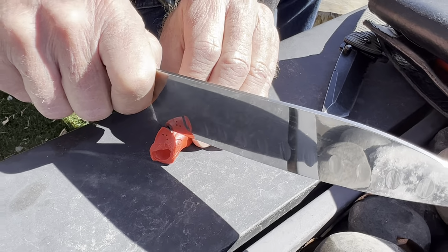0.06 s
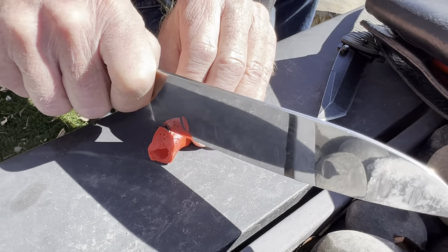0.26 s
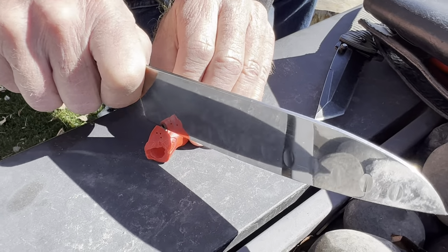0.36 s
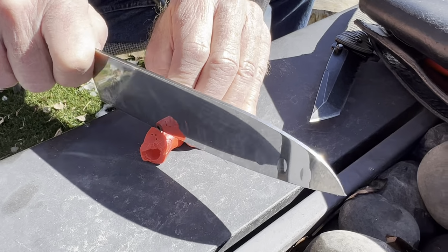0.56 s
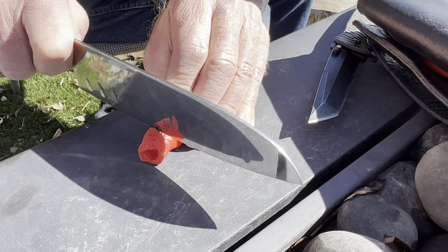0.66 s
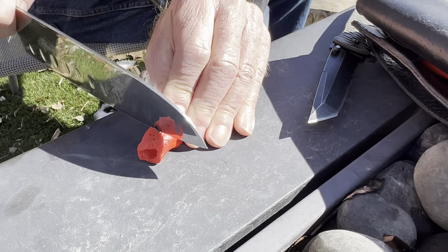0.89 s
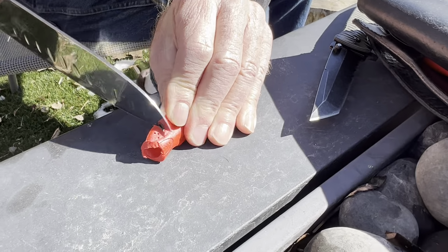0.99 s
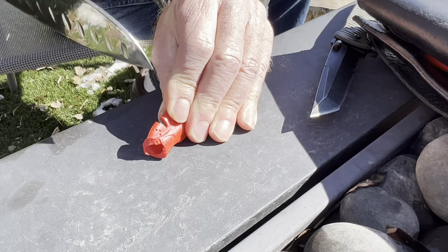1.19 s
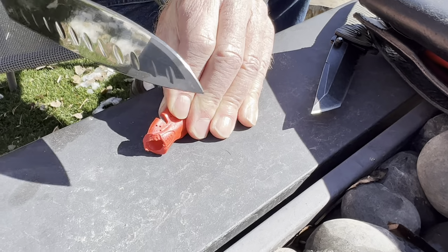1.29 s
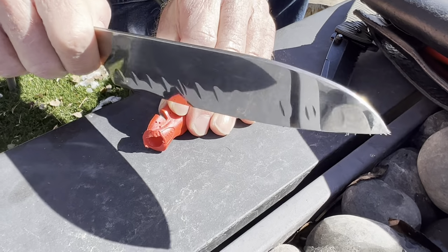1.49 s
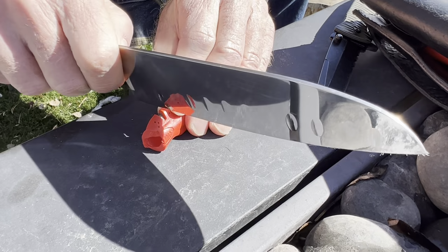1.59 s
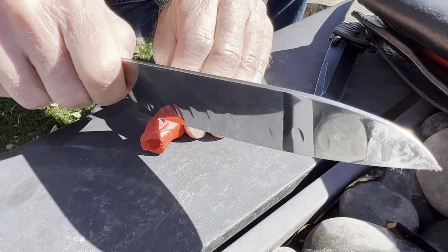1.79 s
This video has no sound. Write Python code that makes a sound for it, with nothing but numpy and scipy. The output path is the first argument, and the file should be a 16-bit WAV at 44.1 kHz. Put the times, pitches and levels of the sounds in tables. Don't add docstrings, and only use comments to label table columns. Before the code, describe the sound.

A knife blade drags through a carbide sharpener with one harsh, juddering metallic scrape outdoors

```python
import sys
import numpy as np
from scipy import signal
from scipy.fft import rfft, irfft, next_fast_len
from scipy.io import wavfile
from scipy.ndimage import uniform_filter1d

SR = 44100
rng = np.random.default_rng(int(sys.argv[2]) if len(sys.argv) > 2 else 0)


def undo_db(level):
    steps = np.asarray(level, float) / 20
    return 10 ** steps


def to_wav(sig):
    pcm = np.clip(np.atleast_2d(sig), -1, 1) * 32767
    pcm = np.round(pcm).astype(np.int16)
    wavfile.write(sys.argv[1], SR, pcm.T)


N = 81585
T_S = np.arange(N) / SR
FFT_SIZE = next_fast_len(N + 16384)
FFT_HZ = np.arange(FFT_SIZE // 2 + 1) * SR / FFT_SIZE

# (frequency [Hz], level [dB])
AIR_SPECTRUM = [(150, -4), (400, -11.5), (1000, -9.5), (2000, -18), (3800, -32.5), (5700, -28.5),
                (12000, -35), (15500, -40)]
# (time [s], level [dB])
GUST_LEVEL = [(0, -47.5), (.3, -44.5), (.65, -38), (.9, -36.5), (1.03, -32), (1.11, -45), (1.2, -26.5),
              (1.32, -38), (1.47, -43), (1.55, -29.5), (1.68, -47.5), (1.85, -40.5)]
# (frequency [Hz], level [dB])
WIND_SPECTRUM = [(25, -45), (45, -1.5), (75, 0), (130, -6.5), (250, -14.5), (500, -30.5)]
# (centre [s], peak [dB], frequency [Hz], left minus right [dB])
LARGE_EDDIES = [(0.107, -25, 63, -1), (.16, -30, 68.6, -2), (.535, -29.5, 65, 6), (0.626, -31, 72, 1),
                (.845, -24, 64, 3), (0.985, -17, 77.5, -0.5), (1.049, -37, 61.6, -16), (1.151, -28, 63, 5),
                (1.222, -27.5, 81, 7), (1.274, -30, 68, -2), (1.356, -22.5, 87.5, -3), (1.4, -24, 66.6, -3),
                (1.527, -29, 78, -2), (1.555, -22, 101, 1), (1.589, -45, 80, -8), (1.736, -26.5, 108, -2.5),
                (1.755, -29, 76, -1), (1.811, -38.5, 111, -2)]
# (centre [s], peak [dB], frequency [Hz], left minus right [dB])
SMALL_EDDIES = [(1.127, -51, 168, -1), (1.184, -22, 140, 1), (1.198, -25, 168, 3), (1.21, -23.5, 171, 2),
                (1.226, -33, 150, -5), (1.24, -32.5, 169, 7), (1.259, -34, 178, 0),
                (1.361, -35.5, 163, -11), (1.461, -50, 159, 0), (1.525, -25.5, 168, 0),
                (1.555, -28, 169, -2), (1.581, -27.5, 193, 1), (1.739, -36.5, 167, 0)]
# (time [s], pressure [dB], sliding speed [dB], extra ring near the tip tone [dB])
STROKE = [
    (.275, -60, -68, -6),
    (.287, -33.5, -46, -3),
    (.34, -26.5, -51, -5),
    (.39, -20.5, -39, -7.5),
    (.6, -24, -38, -0.5),
    (.8, -23, -38, -1),
    (.92, -29.5, -37, 10),
    (1.028, -31, -44.5, 15.5),
    (1.042, -49, -54.5, 10),
    (1.11, -72, -72, 9),
]
# (time [s], strength [dB])
EDGE_BITES = [
    (0.28, -29),
    (0.3, -19),
    (0.318, -30),
    (.347, -30),
    (0.377, -40),
    (0.912, -6.5),
    (0.95, -19),
    (0.975, -27),
    (1.01, -23.5),
    (1.021, -30),
]
# (time [s], peak [dB], frequency [Hz])
JUDDERS = [(0.381, -15, 590), (0.386, -13, 570), (0.402, -21, 630), (0.413, -24, 623), (0.429, -17, 560),
           (0.438, -15, 656), (0.443, -13, 605), (0.465, -18, 610), (0.472, -10, 580), (0.48, -17, 660),
           (0.491, -8.5, 590), (0.498, -13.5, 553), (0.505, -25, 594), (0.516, -20, 560), (0.522, -30, 520),
           (0.528, -13, 440), (0.537, -17, 590), (0.554, -6, 550), (0.566, -8, 552), (0.583, -24, 585),
           (0.591, -27, 610), (0.605, -20, 545), (0.611, -27, 586), (0.621, -24, 626), (0.627, -19, 526),
           (0.633, -27, 547), (0.651, -19.5, 532), (0.658, -20, 606), (0.663, -21.5, 600),
           (0.671, -20.5, 595), (0.679, -15.5, 550), (0.688, -14.5, 550), (0.693, -10.5, 628),
           (0.702, -16, 590), (0.71, -23, 630), (0.731, -28, 535), (0.752, -32, 620), (0.77, -19.5, 620),
           (0.782, -17.5, 674), (0.802, -21, 580), (0.815, -20, 584), (0.823, -17, 576), (0.89, -17, 487),
           (0.901, -12.5, 574), (0.92, -14, 580), (0.929, -30, 600), (0.935, -20, 580), (0.941, -18, 495),
           (0.974, -16.5, 596), (0.981, -19, 580), (1.01, -21.5, 580), (1.016, -18.5, 563),
           (.286, -30.5, 443), (.303, -24, 570), (.324, -24.5, 544), (.5615, -12, 507)]
# (frequency [Hz], level [dB], t60 [s])
BODY_MODES = [(355, -11, 0.12), (438, -8, 0.1), (548, 0, 0.035), (600, -1, 0.045), (665, 3, 0.04),
              (722, -2, 0.03), (880, -16, .05), (962, -10.5, 0.06), (1145, -12, .05), (1230, -13, .04),
              (1410, -10, 0.035), (1800, -5.5, 0.016), (1990, -5, 0.025), (2260, -8, 0.045)]
# (frequency [Hz], density [dB per Hz])
RASP_SPECTRUM = [(300, -5), (1000, -9.5), (2300, -10.5), (3500, -18), (6300, -22), (9300, -24),
                 (11500, -17), (15850, -30)]
# (frequency [Hz], level [dB], t60 [s])
GRIPPED_MODES = [(2600, -3, .02), (3100, 0, .03), (3650, -2, .03), (5370, 0, .025), (5700, -2, .03),
                 (7430, -4, .02), (8380, -3, .025), (11500, 0, .01), (13400, -4, .01)]
# (frequency [Hz], level [dB], t60 [s])
FREE_MODES = [(5609, 0, .5), (6761, -8, .3), (7973, -9, .19), (12160, -5, .25), (12930, -4, .13),
              (13750, -2, .22), (9300, -6, .12)]
# (time [s], ring [dB], tick [dB], knock [dB], tick frequency [Hz])
CONTACTS = [
    (1.471, -80, -55, -77, 11600),
    (1.481, -80, -40, -52, 3600),
    (1.604, -79, -65, -78, 10600),
    (1.7078, -31, -28.5, -30, 9500),
    (1.7845, -58, -60, -55, 8000),
    (1.794, -56, -54, -55, 12500),
    (1.8485, -60, -42, -48, 5000),
]
# (frequency [Hz], level [dB], t60 [s])
SEATED_MODES = [(910, -10, .06), (2616, -14, .06), (3666, -17, .05), (4355, -18, .07), (4800, -10, .02),
                (5313, -13, .06), (5830, -7, .1), (6433, -9, .1), (7400, -7, .02), (8759, -7, .04),
                (11270, -3, .022), (12230, -1, .025), (13520, 0, .028), (15400, -8, .02)]
# (frequency [Hz], level [dB], t60 [s])
KNOCK_MODES = [(516, 11, 0.022), (617, 2, 0.02), (930, -1, .05), (1480, -3, 0.04), (2000, -8, 0.03),
               (3150, -12, 0.03)]
# (start [s], length [s], level [dB])
SLOT_GRAZES = [
    (1.487, .012, -58),
    (1.508, .025, -58),
    (1.59, .008, -64),
]
# (frequency [Hz], level [dB], t60 [s])
SQUEAK_MODES = [(8750, 0, .018), (11500, -1, .018), (5900, -16, .02)]
# (frequency [Hz], lead [rad], likeness [0-1], level [dB])
PORT_RESPONSE = [(250, -.3, .85, 0), (700, -.6, .96, -.7), (1700, -2.7, .7, 0), (2300, -4.4, .4, 0),
                 (3500, -4.5, .8, 0), (5600, -7.5, .4, -10), (7300, -6.2, .85, -2), (8600, -4.8, .7, -1.5),
                 (9500, -np.pi, 1, 0), (10500, -np.pi, 1, 0), (11500, -1.9, .92, 0), (13000, 0, 1, 0),
                 (13800, 0, 1, 0), (15000, 1.4, .7, 0), (15600, np.pi, 1, 0)]


def unit(x):
    return x / np.sqrt(np.mean(x ** 2))


def curve(table, col, off_db=-120):
    a = np.array(table)
    return np.interp(T_S, a[:, 0], a[:, col], off_db, off_db)


def colour(x, table):
    a = np.array(table)
    gain = undo_db(np.interp(np.log(FFT_HZ + 1), np.log(a[:, 0]), a[:, 1], -90, -90))
    return irfft(rfft(x, FFT_SIZE) * unit(gain), FFT_SIZE)[..., :N]


def ring(x, modes):
    t = T_S[:16384]
    h = 0
    for hz, db, t60_s in modes:
        h = h + undo_db(db) * np.exp(-np.log(1000) * t / t60_s) * np.sin(2 * np.pi * hz * t)
    h = h / np.sqrt(np.sum(h ** 2))
    return irfft(rfft(x, FFT_SIZE) * rfft(h, FFT_SIZE), FFT_SIZE)[..., :N]


def grains(per_s, spread_db):
    size = undo_db(spread_db * rng.exponential(size=(2, N))) * rng.standard_normal((2, N))
    return unit(size * (rng.random((2, N)) < per_s / SR))


def walk(per_s):
    k = int(SR / per_s)
    steps = np.repeat(rng.standard_normal(N // k + 1), k)
    return unit(uniform_filter1d(steps, k)[:N])


def bump(at_s, decay_s):
    return np.clip((T_S - at_s) * 2000, 0, 1) * np.exp(-np.maximum(T_S - at_s, 0) / decay_s)


def click(at_s):
    return 1. * (np.arange(N) == int(at_s * SR))


def body_highpass(x, order):
    return signal.sosfilt(signal.butter(order, 300, "high", fs=SR, output="sos"), x)


def distance():
    level_db = -54 + 0.24 * walk(1.3)
    return undo_db(level_db) * colour(rng.standard_normal((2, N)), AIR_SPECTRUM)


def wind():
    likeness, flutter_db, flutter_per_s = 0.52, 5.5, 21
    shared, own = rng.standard_normal(N), rng.standard_normal((2, N))
    flutter = np.array([walk(flutter_per_s), walk(flutter_per_s)])
    gust_db = curve(GUST_LEVEL, 1, -45) + flutter_db * flutter
    air = np.sqrt(likeness) * shared + np.sqrt(1 - likeness) * own
    return undo_db(gust_db) * colour(air, WIND_SPECTRUM)


def buffets():
    length_cycles, phase_spread_rad = 0.82, 0.52
    out = 0
    for s, db, hz, pan_db in LARGE_EDDIES + SMALL_EDDIES:
        turns = (T_S - s) * hz
        port_phase = np.array([[0], [rng.normal(0, phase_spread_rad)]])
        wobble = np.sin(2 * np.pi * (turns + rng.random()) + port_phase)
        level_db = db + np.array([[pan_db], [-pan_db]]) / 2
        out = out + undo_db(level_db) * np.exp(-(turns / length_cycles) ** 2) * wobble
    return out


def judders():
    length_cycles, split = 1.78, .11
    out, env = np.zeros((2, N)), np.zeros(N)
    for s, db, hz in JUDDERS:
        sign_draw, lag_draw, split_draw, phase_draw = rng.random(4)
        at = slice(int((s - .02) * SR), int((s + .02) * SR))
        turns = (T_S[at] - s) * hz
        shape = undo_db(db) * np.exp(-(turns / length_cycles) ** 2)
        tones = 0
        for side in (-1, 1):
            detune = 1 + side * split * (.5 + split_draw)
            tones = tones + np.cos(2 * np.pi * turns * detune + side * (phase_draw - .5))
        pair = np.array([tones, np.roll(tones, int(lag_draw * 60))])
        out[:, at] += shape * np.sign(sign_draw - .5) * pair / 2
        env[at] += shape
    return out, env


def wander(x, modes, tip_db):
    drift_db, drift_per_s, tip_hz, tip_octaves = 3.2, 16, 1350, .4
    out = 0
    for k, (hz, db, t60_s) in enumerate(modes):
        near_tip = np.exp(-(np.log2(hz / tip_hz) / tip_octaves) ** 2)
        level_db = drift_db * walk(drift_per_s) + tip_db * near_tip
        mode = ring(x * undo_db(level_db), [(hz, 0, t60_s)])
        out = out + (-1) ** k * undo_db(db) * np.sqrt(t60_s * 15) * mode
    return out


def scrape():
    thuds, judder_env = judders()
    bites = undo_db(-7) * judder_env
    for s, db in EDGE_BITES:
        bites = bites + undo_db(db) * bump(s, 0.0057)

    stutter_s, stutter_end_s, stutter_hz, stutter_db = .282, .385, 58, 22
    depth_db = stutter_db * np.clip((stutter_end_s - T_S) / (stutter_end_s - stutter_s), 0, 1)
    stutter = -depth_db * ((T_S - stutter_s) * stutter_hz % 1) ** 2

    slip_db = curve(STROKE, 1) + stutter / 4 + 0.5 * walk(80.6)
    slips = grains(3000, 2.5) * (undo_db(slip_db) + undo_db(-4) * bites)
    swarf_db = curve(STROKE, 2) + stutter + 1.1 * walk(70)
    swarf = grains(20000, 1.5) * (undo_db(swarf_db) + undo_db(-54) * bites)

    body = body_highpass(wander(slips, BODY_MODES, curve(STROKE, 3, 0)), 4)
    rasp = colour(swarf, RASP_SPECTRUM)
    free_s, freeing_s, tip_leaves_s = 1.02, .03, 1.036
    free = np.clip((T_S - free_s) / freeing_s + 1, .1, 1)
    gripped = wander(swarf[::-1], GRIPPED_MODES, 0)
    blade = undo_db(-7.5) * gripped + undo_db(-3) * ring(swarf * free, FREE_MODES)
    pluck = ring(click(tip_leaves_s), FREE_MODES)
    return undo_db(-8) * body + undo_db(6.5) * rasp + blade + undo_db(-20) * pluck + undo_db(-1.5) * thuds


def touches():
    tick_s = .0022
    out, noise = 0, rng.standard_normal((2, N))
    for s, ring_db, tick_db, knock_db, hz in CONTACTS:
        hit = noise * bump(s, tick_s)
        seated = ring(hit / 2 + 6 * click(s), SEATED_MODES)
        knock = body_highpass(ring(click(s + tick_s), KNOCK_MODES), 2)
        tick = colour(hit, [(hz / 5, -10), (hz, 0), (hz * 1.8, -10), (20000, -30)])
        out = out + undo_db(ring_db + 6) * seated + undo_db(knock_db + 20.5) * knock + undo_db(tick_db) * tick
    rub = grains(2200, 2.4)
    for s, length_s, db in SLOT_GRAZES:
        out = out + undo_db(db) * ring(rub * bump(s, length_s), SQUEAK_MODES)
    return out


def snap():
    hit = rng.standard_normal(N) * bump(1.7073, .0016)
    return undo_db(-34) * colour(hit, [(7000, -12), (10000, -2), (14000, 6), (16500, -6)])


def ports(pair):
    a = np.array(PORT_RESPONSE)
    lead_rad, likeness, db = (np.interp(FFT_HZ, a[:, 0], a[:, k]) for k in (1, 2, 3))
    left, twin = rfft(pair, FFT_SIZE)
    mixed = likeness * left + np.sqrt(1 - likeness ** 2) * twin
    right = mixed * undo_db(db) * np.exp(1j * lead_rad)
    return irfft(np.array([left, right]), FFT_SIZE)[:, :N]


def scene():
    return ports(distance() + scrape() + touches()) + wind() + buffets() + snap()


def band_limit(x):
    return signal.sosfilt(signal.butter(12, 16610, fs=SR, output="sos"), x)


def record(dry):
    top_cut = signal.ellip(8, .2, 60, 16700, fs=SR, output="sos")
    mix = signal.sosfilt(top_cut, dry)
    return band_limit(mix)


dry = scene()
out = record(dry)
to_wav(out)
```